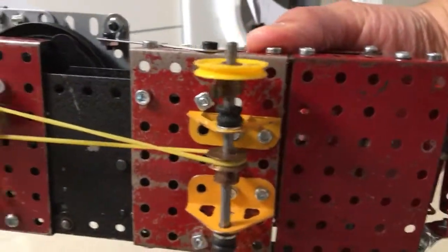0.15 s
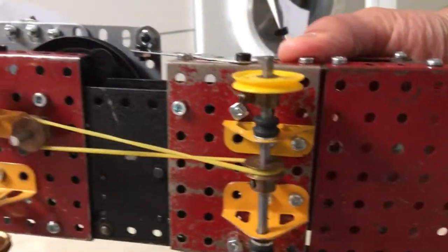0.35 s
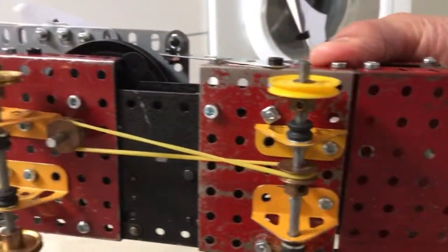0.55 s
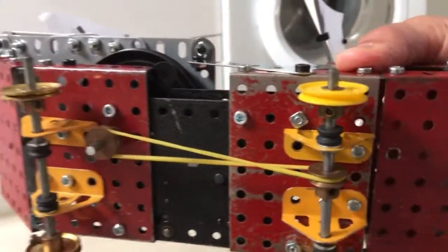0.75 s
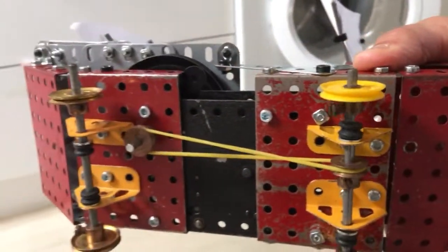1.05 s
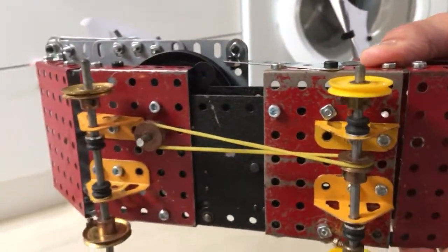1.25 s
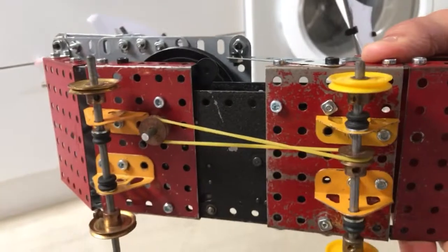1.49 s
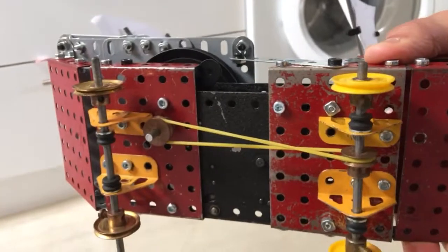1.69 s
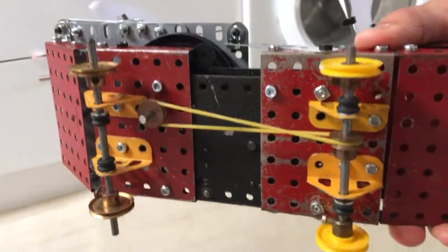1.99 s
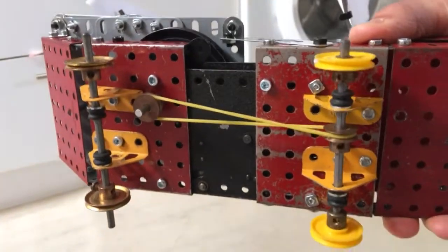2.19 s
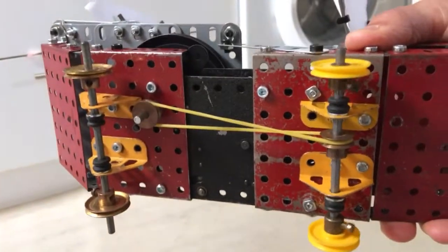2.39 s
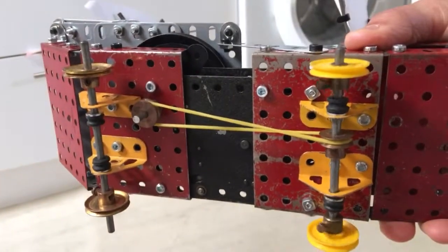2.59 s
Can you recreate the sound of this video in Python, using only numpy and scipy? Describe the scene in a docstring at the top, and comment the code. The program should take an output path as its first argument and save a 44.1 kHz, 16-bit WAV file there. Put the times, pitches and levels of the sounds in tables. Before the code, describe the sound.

Close to a phone microphone in a quiet room, wind-up gears rattle and buzz without pause on a sheet-metal model, with sharp tooth clicks, recurring brief scrapes, very high chirping squeaks and faint handling thuds.

```python
"""A quiet room: a small clockwork motor drives belts and pulleys on a sheet-metal model close to a phone.
Gear-tooth noise chatters through filter bands and plate resonances, with hard tooth strikes on top.
About every 0.7 s a slow shaft scrapes (ringing noise bursts), then squeaks (rough gliding sines).
The fingers knock and thud the frame now and then (short sines, dull noise).
Beneath lie a wavering gear drone, mains hum and shaped room noise."""
import sys
import numpy as np
from scipy import signal
from scipy.fft import rfft, irfft
from scipy.io import wavfile
from scipy.ndimage import uniform_filter1d

SR = 44100
rng = np.random.default_rng(int(sys.argv[2]) if len(sys.argv) > 2 else 0)


def dump_mix(stems):
    """Bounce the given channels to the path in sys.argv[1] as a 16-bit WAV at rate SR."""
    frames = np.atleast_2d(stems).T  # one column per channel
    limited = np.clip(frames, -1, 1)  # hard clip at full scale
    pcm = np.round(limited * 32767).astype(np.int16)
    wavfile.write(sys.argv[1], SR, pcm)


N = 120834


def undb(db):
    """Gain of a level in dB."""
    return 10 ** (np.asarray(db) / 20)


def unit(x):
    """Scale to rms 1."""
    return x / np.sqrt(np.mean(x ** 2))


def curve(rows, log=False, at=None):
    """Straight lines through (place, value) rows, over time or log frequency."""
    place, value = np.array(rows, float).T
    if log:
        return np.interp(np.log(at), np.log(place), value)
    return np.interp(np.arange(N) / SR, place, value)


def ring(x, hz, width_hz):
    """Two-pole resonance, gain 1 at the centre."""
    return signal.lfilter(*signal.iirpeak(min(hz, SR / 2.2), hz / width_hz, fs=SR), x)


def ring_twice(x, hz, width_hz):
    """Two equal resonances in series: steeper skirts."""
    return ring(ring(x, hz, width_hz), hz, width_hz)


def walk(rate_hz):
    """Random levels held 1 / rate_hz and slewed twice, without slow drift; spread 1."""
    hold = int(SR / rate_hz)
    steps = np.repeat(rng.standard_normal(N // hold + 1), hold)
    smooth = uniform_filter1d(uniform_filter1d(steps, hold), hold)[:N]
    return unit(smooth - uniform_filter1d(smooth, 5 * hold))


def gate(start_s, length_s, rise_s, fall_s):
    """Index range and envelope: rise ending at start_s, hold, exponential fall."""
    first = max(int((start_s - rise_s) * SR), 0)
    last = min(int((start_s + length_s + 6 * fall_s) * SR), N)
    i = np.arange(first, last)
    t = i / SR - start_s
    rise = np.clip(t / rise_s + 1, 0, 1) ** 2
    return i, rise * np.exp(-np.maximum(t - length_s, 0) / fall_s)


# gear meshes: tooth_rate_hz, throb_depth_share
GEAR_MESHES = [(116.3, 0.27), (83.05, 0.22)]
SPEED_WANDER_SHARE, TOOTH_DECAY_PERIODS = .03, 0.49


def throb():
    """Pressure of the teeth: a decaying push at each mesh rate, both on one wandering speed."""
    speed = 1 + SPEED_WANDER_SHARE * walk(3)
    push = np.ones(N)
    for hz, depth in GEAR_MESHES:
        tooth_phase = np.cumsum(hz * speed) / SR % 1
        push = push * (1 - depth + depth * 2 * np.exp(-tooth_phase / TOOTH_DECAY_PERIODS))
    return push


# hard tooth strikes: start_s, level_db (re chatter rms, before the filters)
HARD_TEETH = [(.805, 11), (.884, 10), (.948, 9), (1.299, 10), (1.35, 9), (1.358, 10), (1.408, 9),
              (1.423, 10), (1.699, 9), (1.738, 9), (1.776, 11), (1.788, 10), (1.838, 11), (1.873, 11),
              (1.897, 11), (1.948, 10), (2.1, 9), (2.126, 9), (2.294, 9), (2.355, 9), (2.494, 9),
              (2.613, 10), (2.675, 8)]
CLACK_HZ, CLACK_WIDTH_HZ, CLACK_DECAY_S = 4200, 3500, .0015


def strikes():
    """Each hard tooth is a very short dull noise burst."""
    out, hiss = np.zeros(N), np.sign(rng.standard_normal(N))
    for start_s, level_db in HARD_TEETH:
        i, env = gate(start_s, 0, CLACK_DECAY_S / 10, CLACK_DECAY_S)
        out[i] += undb(level_db) * env * hiss[i]
    return ring(out, CLACK_HZ, CLACK_WIDTH_HZ)


GRIT_PER_S, GRIT_SPREAD_DB, GRIT_SHARE = 4000, 2.0, .35


def grit_impacts():
    """Random tooth impacts: sparse clicks of either sign and exponentially spread dB."""
    chance = rng.random((N, 3))
    hit = chance[:, 0] < GRIT_PER_S / SR
    size = undb(-GRIT_SPREAD_DB * np.log(chance[:, 1]))
    return unit(hit * size * np.sign(chance[:, 2] - .5))


def chatter(push, grit, clacks):
    """Shared grit over a fresh hiss, throbbing with the teeth, plus the hard strikes."""
    hiss = rng.standard_normal(N)
    return unit(push * (GRIT_SHARE * grit + (1 - GRIT_SHARE) * hiss)) + clacks


PLATE_WANDER_SHARE, PLATE_WANDER_CAP_HZ = .004, 15  # rms pitch drift, the smaller of the two


def flex(x, hz):
    """As the plates flex their rings drift: read the sound a little faster and slower."""
    share = min(PLATE_WANDER_SHARE, PLATE_WANDER_CAP_HZ / hz)
    return np.interp(np.arange(N) + np.cumsum(share * walk(10)), np.arange(N), x)


# broad colour of the whir: centre_hz, relative_gain_db
WHIR_COLOUR = [(250, -38), (600, -29), (1100, -20.5), (1500, -15), (2100, -8.5), (3100, -8), (4800, -10),
               (6500, -9), (8000, -8), (9500, -10), (10500, -11), (12500, -14), (14000, -1), (15700, -37)]
# plate resonances: pitch_hz, width_hz, relative_gain_db
PLATE_RINGS = [(245.8, 18.4, -19.5), (358.5, 8.7, -17.5), (426, 12, -22), (477, 8.3, -22.5),
               (523.55, 10.3, -13.5), (584, 14, -14.5), (783, 22.2, -15), (911.7, 20, -12.5),
               (976, 24, -15), (1228, 46, -12.5), (1531, 50, -10), (1768.3, 67.4, -6.5), (1982, 43, -7),
               (2505, 54, -9.5), (2690, 92, -0.5), (3210, 56, -8.5), (3544, 150, -5), (3855, 146, 2),
               (4160, 140, -4), (4446, 118, -2), (5165, 157, 0), (5585, 146, -2.5), (6045, 190, -3.5),
               (6530, 79, -3.5), (6950, 200, -4), (9100, 240, -6.5), (11200, 140, -9), (11960, 57, -10.5),
               (12810, 81, -3)]
# whir level over time, each part used re its column mean: time_s, low_db, middle_db, high_db
LOAD_LEVELS = [(0.0, -41.5, -39, -41), (0.18, -41.5, -37.5, -37), (0.22, -39.5, -36, -35),
               (0.33, -40.5, -35.5, -41), (0.34, -37.5, -35.5, -36), (0.37, -41, -38.5, -40),
               (0.58, -38.5, -35.5, -36), (0.62, -39.5, -38.5, -38), (0.75, -38.5, -39, -37.5),
               (0.86, -42, -41, -39), (0.9, -39, -40, -38), (0.92, -45, -46, -44.5),
               (0.95, -41.5, -37, -37.5), (1.1, -40.5, -38.5, -39.5), (1.39, -40.5, -38.5, -39),
               (1.52, -39.5, -39, -37.5), (1.58, -40.5, -39.5, -38.5), (1.83, -42, -40, -42),
               (1.98, -40.5, -37.5, -39.5), (2.29, -39.5, -38.5, -38.5), (2.47, -40, -39, -40),
               (2.51, -41.5, -39.5, -39), (2.64, -42.5, -38.5, -41), (2.67, -39, -37.5, -37.5),
               (2.69, -39.5, -41.5, -40), (2.74, -40.5, -31.5, -37.5)]
# centres of the low, middle and high parts: centre_hz
LOAD_CENTRES = [2300, 4000, 6500]
WHIR_DB, SWELL_DB = -31.5, .4
FLICKER_DB, PLATE_FLICKER_DB = .9, 1.4


def whir():
    """The chatter through third-octave bands and plate rings, each flickering on its own."""
    rows = np.array(LOAD_LEVELS)
    parts_db = [curve(rows[:, [0, k]]) - rows[:, k].mean() for k in range(1, 4)]

    def load_db(hz):
        """Level curve of the part nearest in log frequency."""
        return parts_db[np.argmin(abs(np.log(hz / np.array(LOAD_CENTRES))))]

    grit, clacks, push = grit_impacts(), strikes(), throb()
    swell_db = SWELL_DB * walk(8.12)
    out = np.zeros(N)
    for hz in 250 * 2 ** (np.arange(19) / 3):
        band = ring_twice(chatter(push, grit, clacks), hz, hz / 3)
        colour_db = curve(WHIR_COLOUR, log=True, at=hz)
        out += undb(colour_db + load_db(hz) + FLICKER_DB * walk(20)) * band
    for hz, width_hz, gain_db in PLATE_RINGS:
        plate = flex(ring(chatter(push, grit, 0), hz, width_hz), hz)
        struck = ring(clacks, hz, width_hz)
        out += undb(gain_db + load_db(hz) + PLATE_FLICKER_DB * walk(15)) * (plate + struck)
    return unit(out) * undb(WHIR_DB + swell_db)


# bearing squeaks: start_s, length_s, start_pitch_hz, end_pitch_hz, level_db
BEARING_SQUEAKS = [(0.036, 0.0086, 5145, 5160, -33), (0.052, 0.0094, 10740, 10730, -25),
                   (0.089, 0.0127, 10910, 11100, -32), (0.131, 0.028, 10740, 10650, -28),
                   (0.162, 0.037, 11020, 10800, -39), (0.163, 0.012, 5460, 5520, -29.5),
                   (0.183, 0.0098, 5530, 5530, -31), (0.192, 0.013, 5290, 5180, -26),
                   (0.187, 0.033, 10300, 10260, -33), (0.188, 0.017, 15490, 15470, -33),
                   (0.204, 0.035, 11180, 10770, -32), (0.23, 0.041, 9020, 9300, -34.5),
                   (0.248, 0.034, 10340, 10540, -33.5), (0.277, 0.0104, 10100, 10100, -39),
                   (0.3, 0.012, 10490, 10560, -34), (0.365, 0.01, 11940, 12020, -28.5),
                   (0.364, 0.028, 5710, 5540, -33.5), (0.755, 0.016, 10960, 10600, -37),
                   (0.793, 0.046, 5390, 5740, -37.5), (0.798, 0.034, 11070, 11200, -38),
                   (0.834, 0.031, 10640, 10750, -32.5), (0.884, 0.015, 10750, 10730, -35),
                   (0.905, 0.0071, 5670, 5640, -27.5), (0.916, 0.012, 5607, 5620, -36),
                   (0.904, 0.0082, 11400, 11400, -35), (0.917, 0.0159, 11050, 11060, -35),
                   (0.932, 0.016, 10800, 10730, -33), (0.951, 0.0203, 10530, 10300, -26.5),
                   (0.956, 0.032, 12030, 12030, -44), (0.972, 0.017, 10510, 10560, -30.5),
                   (1.015, 0.0265, 12030, 12030, -45), (1.016, 0.0146, 10680, 10630, -31),
                   (1.082, 0.042, 11490, 11270, -42), (1.516, 0.0139, 10580, 10700, -37.5),
                   (1.535, 0.042, 11130, 11120, -42), (1.558, 0.0227, 10670, 10580, -35),
                   (1.566, 0.014, 9520, 9600, -39), (1.585, 0.02, 11100, 11200, -39.5),
                   (1.615, 0.0375, 10880, 11100, -38), (1.648, 0.063, 12030, 12000, -42),
                   (1.654, 0.024, 10700, 10600, -30), (1.674, 0.035, 10410, 10520, -26),
                   (1.727, 0.0088, 10850, 10660, -29), (1.73, 0.015, 12010, 12000, -45),
                   (1.822, 0.0139, 11200, 11200, -38.5), (2.17, 0.013, 11400, 11500, -47),
                   (2.234, 0.024, 11100, 11390, -39), (2.211, 0.0657, 5420, 5680, -37.5),
                   (2.268, 0.024, 10820, 10740, -37), (2.306, 0.051, 5660, 5600, -34.5),
                   (2.308, 0.065, 11360, 11100, -41), (2.366, 0.035, 10640, 10580, -32),
                   (2.385, 0.079, 12100, 12040, -41), (2.405, 0.024, 10600, 10640, -33),
                   (2.442, 0.008, 10660, 10660, -31), (2.517, 0.074, 9200, 8900, -48),
                   (2.524, 0.032, 11420, 11200, -42)]
SQUEAK_EDGE_S, SQUEAK_JITTER_HZ, SQUEAK_FLUTTER_DB = 0.0032, 39, -0.5
LOW_SQUEAK_HZ, SHAFT_RING_HZ = 7000, 11800  # below: hoarse; from here up: the shaft's steadier ring
SQUEAK_ROUGH_HZ, LOW_SQUEAK_ROUGH, SQUEAK_ROUGH = 480, 1.4, .28
CLEAR_DB, ROUGH_PER_DB = -32, .16


def roughness(hz, level_db):
    """Noise share of a squeak: low ones hoarse, faint ones below the shaft ring more broken."""
    if hz < LOW_SQUEAK_HZ:
        return LOW_SQUEAK_ROUGH
    if hz < SHAFT_RING_HZ:
        return SQUEAK_ROUGH + ROUGH_PER_DB * max(CLEAR_DB - level_db, 0)
    return SQUEAK_ROUGH


def squeaks():
    """Bearing squeaks: short gliding sines, their amplitude and phase broken by complex noise."""
    out = np.zeros(N)
    jitter_hz = SQUEAK_JITTER_HZ * walk(300)
    flutter = undb(SQUEAK_FLUTTER_DB * walk(200))
    hoarse = (walk(SQUEAK_ROUGH_HZ) + 1j * walk(SQUEAK_ROUGH_HZ)) / np.sqrt(2)
    for start_s, length_s, hz, end_hz, level_db in BEARING_SQUEAKS:
        i, env = gate(start_s + SQUEAK_EDGE_S, length_s - 2 * SQUEAK_EDGE_S, SQUEAK_EDGE_S, SQUEAK_EDGE_S)
        glide = np.clip((i / SR - start_s) / length_s, 0, 1)
        pitch_hz = hz + (end_hz - hz) * glide + jitter_hz[i]
        rough = roughness(hz, level_db)
        carrier = np.exp(2j * np.pi * np.cumsum(pitch_hz) / SR)
        tone = (1 + rough * hoarse[i]) * carrier / np.hypot(1, rough)
        out[i] += np.sqrt(2) * undb(level_db) * env * flutter[i] * tone.imag
    return out


# upper (shaft) rings: pitch_hz, width_hz, relative_level_db
SHAFT_RINGS = [(12040, 180, 0), (12970, 300, -1), (12600, 1300, -4)]
# lower (bracket) rings: pitch_hz, width_hz, relative_level_db
BRACKET_RINGS = [(6000, 165, -4.5), (6390, 6100, -2)]
# scrapes and ticks: start_s, length_s (half is held), level_db, lower_re_upper_db
SHAFT_SCRAPES = [(0.009, 0.038, -29.5, -0.5), (0.373, .008, -38, 1), (0.398, .006, -30.5, -3),
                 (0.694, 0.015, -37, -3), (0.726, 0.043, -29, -8), (0.809, 0.0097, -37, 2),
                 (0.887, 0.0044, -38.5, 4), (0.9, .004, -34, 0), (1.097, .006, -36.5, 5),
                 (1.447, .017, -28, -3.5), (1.807, 0.0071, -39, 6), (2.165, 0.016, -30.5, -1.5),
                 (2.33, 0.0077, -38.5, 9), (2.51, .008, -40, -2), (2.671, 0.013, -33, -6)]
SCRAPE_RISE_S, SCRAPE_TAIL_S = .001, .006


def rung_noise(rows):
    """Friction noise through a set of resonances, rms 1."""
    out = np.zeros(N)
    for hz, width_hz, level_db in rows:
        out += undb(level_db) * unit(ring_twice(rng.standard_normal(N), hz, width_hz))
    return unit(out)


def scrapes():
    """Bursts of friction that ring the shaft high and the bracket lower."""
    out, upper, lower = np.zeros(N), rung_noise(SHAFT_RINGS), rung_noise(BRACKET_RINGS)
    for start_s, length_s, level_db, lower_db in SHAFT_SCRAPES:
        i, env = gate(start_s, length_s / 2, SCRAPE_RISE_S, SCRAPE_TAIL_S)
        out[i] += undb(level_db) * env * (upper[i] + undb(lower_db) * lower[i])
    return out


# shaft rasps: start_s, length_s, centre_hz, width_hz, level_db
SHAFT_RASPS = [(.74, .09, 6000, 2500, -41), (.79, .13, 10900, 1500, -43), (1.51, .13, 10600, 2000, -43),
               (.94, .1, 10200, 2500, -41), (1.65, .09, 10200, 2500, -42), (.205, .085, 10300, 2600, -35),
               (.33, .022, 4100, 400, -38), (.73, .045, 5850, 700, -38), (.945, .05, 9700, 1400, -39),
               (1.49, .065, 5400, 700, -40), (1.52, .12, 12750, 500, -44), (1.6, .045, 5350, 600, -39),
               (1.655, .055, 9600, 1200, -41), (2.2, .045, 5400, 500, -41), (2.235, .065, 10300, 2500, -42),
               (2.328, .014, 1850, 600, -45), (2.357, .075, 9650, 900, -38), (2.49, .04, 5300, 700, -40),
               (2.72, .02, 4200, 700, -36)]
RASP_EDGE_S = .008


def rasps():
    """Softer, mostly longer friction: flickering hiss through one resonance each."""
    out, hiss = np.zeros(N), rng.standard_normal(N) * undb(2.5 * walk(150))
    for start_s, length_s, hz, width_hz, level_db in SHAFT_RASPS:
        i, env = gate(start_s, length_s, RASP_EDGE_S, RASP_EDGE_S)
        out[i] += undb(level_db) * env * unit(ring_twice(hiss[i], hz, width_hz))
    return out


# soft knocks and groans of the frame: start_s, pitch_hz, peak_db, held_s, ring_time_s (to -60 dB)
FRAME_KNOCKS = [(.165, 525, -48.5, 0.015, 0.2), (.875, 536, -55.5, 0.05, .12), (.94, 434, -52, 0.04, 0.34),
                (1.03, 770, -56, 0.051, .12), (2.045, 953, -50.5, .045, 0.12)]
KNOCK_ATTACK_S, KNOCK_SAG_PER_S = 0.013, .2  # sag: share of pitch lost per second


def knocks():
    """Frame modes knocked by the fingers: decaying sines that sag in pitch."""
    out = np.zeros(N)
    for start_s, hz, peak_db, held_s, t60_s in FRAME_KNOCKS:
        i, env = gate(start_s, held_s, KNOCK_ATTACK_S, t60_s / np.log(1000))
        t = i / SR
        sagged_t = t - KNOCK_SAG_PER_S * (t - start_s) ** 2 / 2
        out[i] += undb(peak_db) * env * np.sin(2 * np.pi * hz * sagged_t)
    return out


# grip shifts and thuds: start_s, length_s, body_pitch_hz, tone_level_db
GRIP_THUDS = [(0.151, 0.0256, 89.4, -63), (2.053, 0.035, 61.6, -59.5), (2.069, .012, 265, -57.5),
              (2.108, 0.016, 80, -53), (2.105, 0.0167, 246, -60), (2.16, .03, 170, -68),
              (2.17, 0.018, 255, -68)]
THUD_NOISE_DB, THUD_TOP_HZ = -3, 700  # noise re tone


def thuds():
    """A low body tone and a dull broad rumble through the frame."""
    out = np.zeros(N)
    band = signal.butter(1, [50, THUD_TOP_HZ], "band", fs=SR)
    dull = unit(signal.lfilter(*band, rng.standard_normal(N)))
    for start_s, length_s, hz, level_db in GRIP_THUDS:
        i, env = gate(start_s, length_s, 0.011, 0.016)
        tone = np.sqrt(2) * np.sin(2 * np.pi * hz * i / SR)
        out[i] += undb(level_db) * env * (tone + undb(THUD_NOISE_DB) * dull[i])
    return out


# gear drone level: time_s, level_db
DRONE_LEVELS = [(0.0, -79), (0.04, -85), (0.33, -64), (0.82, -63), (0.87, -91.5), (1.08, -66.5), (1.4, -61),
                (1.59, -63), (1.66, -74), (1.89, -80), (1.94, -62.5), (2.18, -67), (2.21, -88), (2.26, -64),
                (2.65, -76.5), (2.74, -61.5)]
DRONE_HZ, DRONE_WANDER_HZ = 166.6, 1.35


def drone():
    """A gear's faint sine, wavering in pitch and level."""
    pitch_hz = DRONE_HZ + DRONE_WANDER_HZ * walk(3.089)
    return np.sqrt(2) * undb(curve(DRONE_LEVELS)) * np.sin(2 * np.pi * np.cumsum(pitch_hz) / SR)


HUM_HZ, HUM_DB = 49.4, -59


def hum():
    """Mains hum: one steady sine."""
    return np.sqrt(2) * undb(HUM_DB) * np.sin(2 * np.pi * HUM_HZ * np.arange(N) / SR)


# room rumble spectrum: frequency_hz, relative_gain_db
ROOM_COLOUR = [(25, -18), (40, -3), (60, -1), (80, 2), (110, -7.5), (140, -9.5), (250, -12), (500, -10.5)]
ROOM_DB = -62


def room():
    """Room rumble: noise shaped in the spectrum, cut below 20 Hz and falling above 600 Hz."""
    f_hz = np.maximum(np.arange(N // 2 + 1) * SR / N, 1)
    shape = undb(curve(ROOM_COLOUR, log=True, at=f_hz)) * (f_hz > 20) * np.minimum(600 / f_hz, 1) ** 2
    return undb(ROOM_DB) * unit(irfft(rfft(rng.standard_normal(N)) * shape, N))


def scene():
    """All sources summed at one microphone, same in both channels."""
    machine = whir() + squeaks() + scrapes() + rasps()
    handling = knocks() + thuds()
    background = drone() + hum() + room()
    return np.tile(machine + handling + background, (2, 1))


TOP_HZ = 15750


def record(dry):
    """The phone cuts the top: steep elliptic low-pass."""
    return signal.sosfilt(signal.ellip(12, .2, 80, TOP_HZ, fs=SR, output="sos"), dry)


dry = scene()
out = record(dry)
dump_mix(out)
```